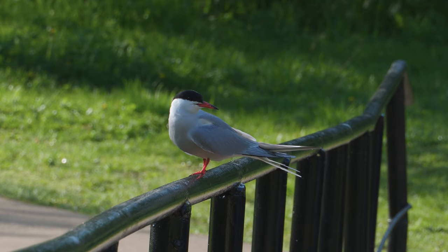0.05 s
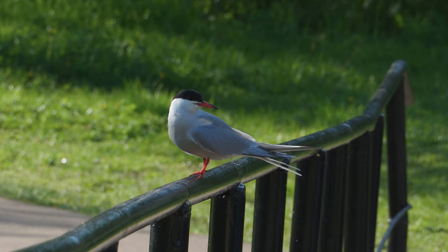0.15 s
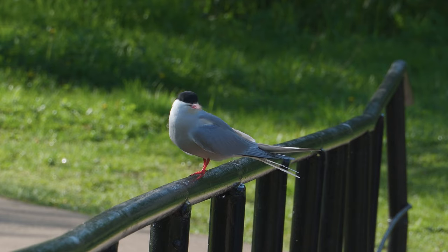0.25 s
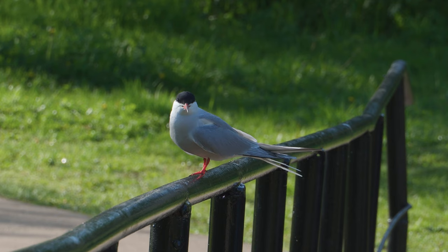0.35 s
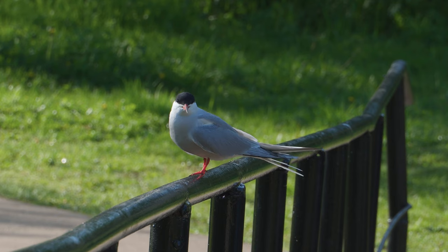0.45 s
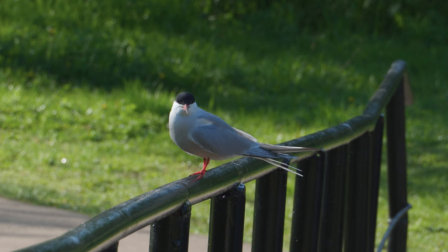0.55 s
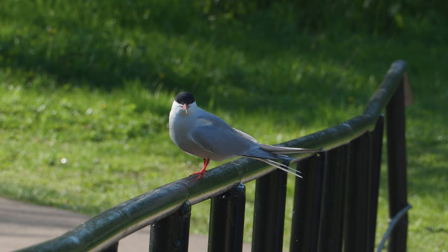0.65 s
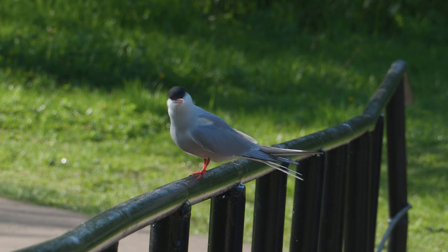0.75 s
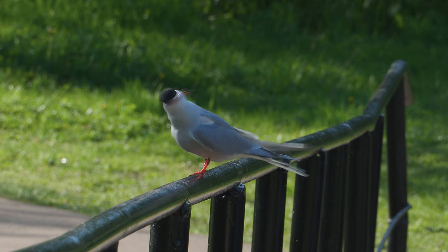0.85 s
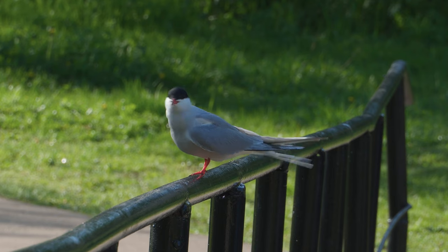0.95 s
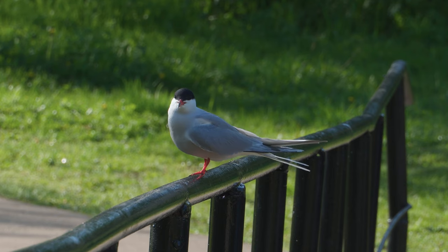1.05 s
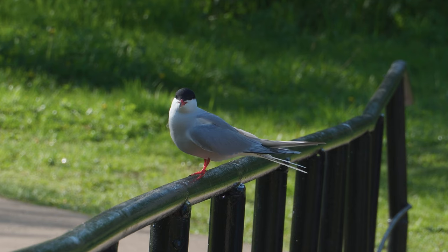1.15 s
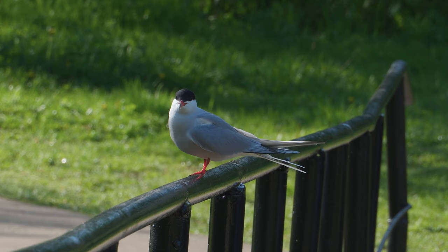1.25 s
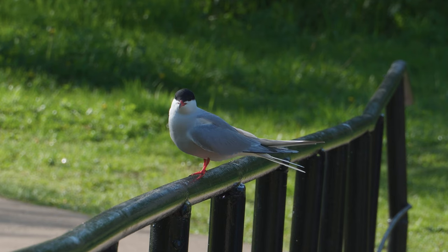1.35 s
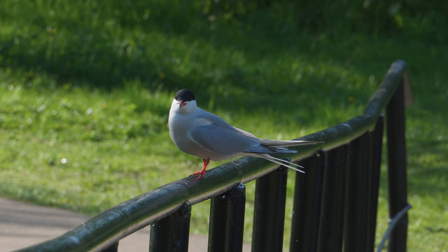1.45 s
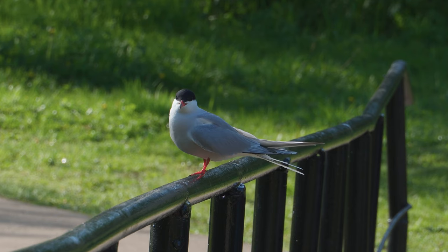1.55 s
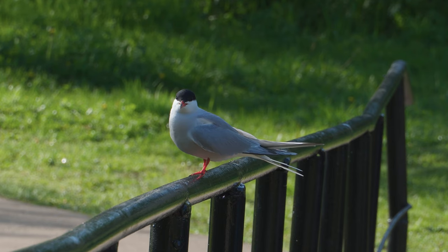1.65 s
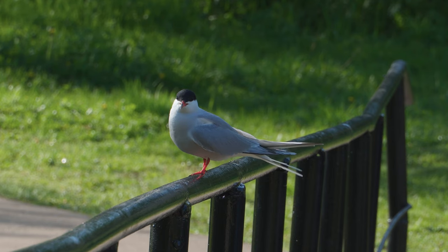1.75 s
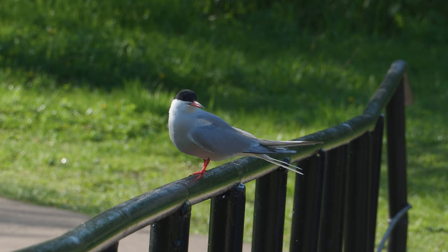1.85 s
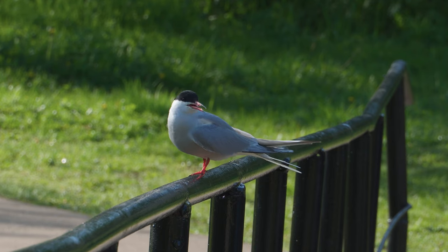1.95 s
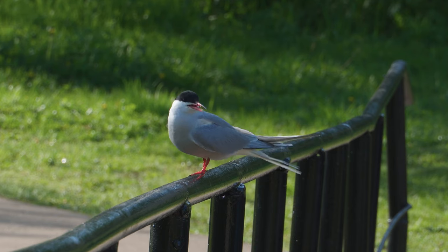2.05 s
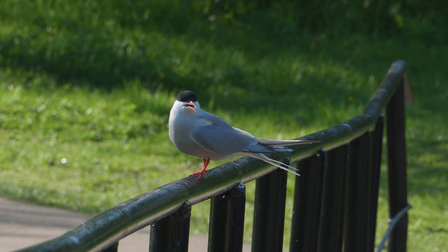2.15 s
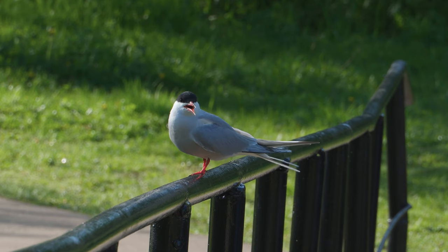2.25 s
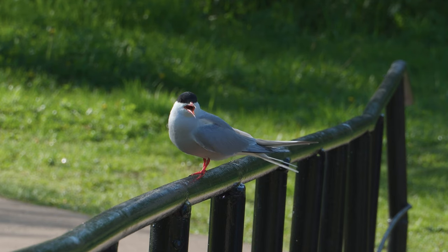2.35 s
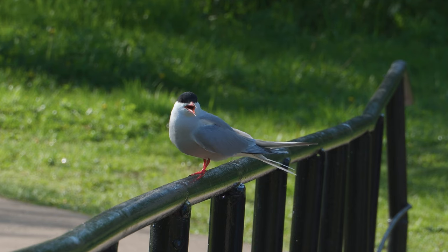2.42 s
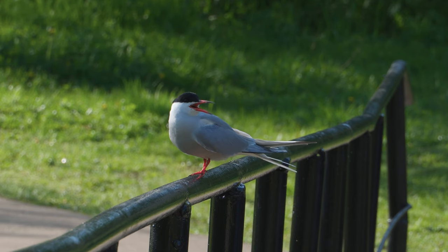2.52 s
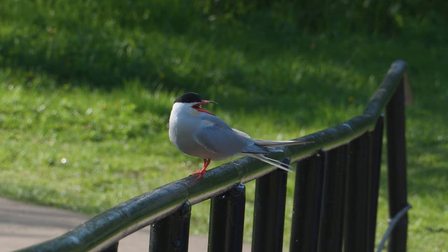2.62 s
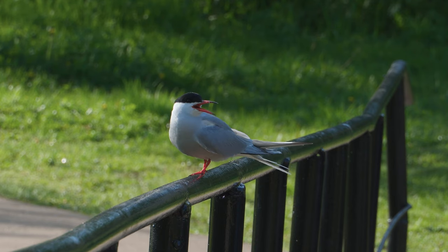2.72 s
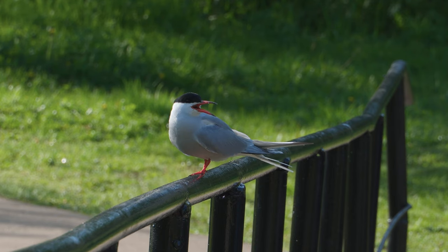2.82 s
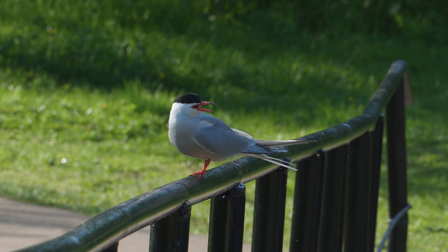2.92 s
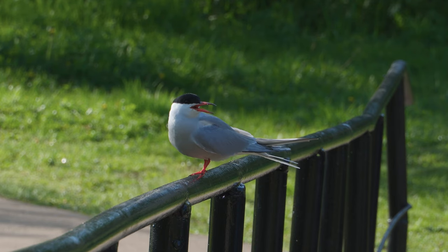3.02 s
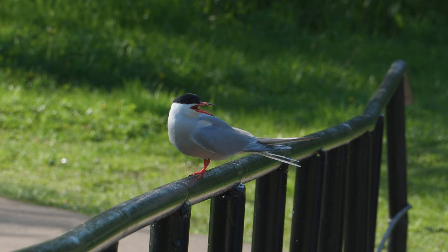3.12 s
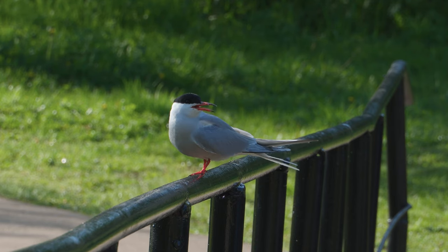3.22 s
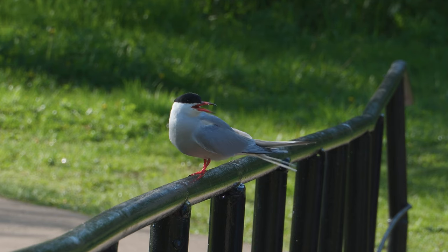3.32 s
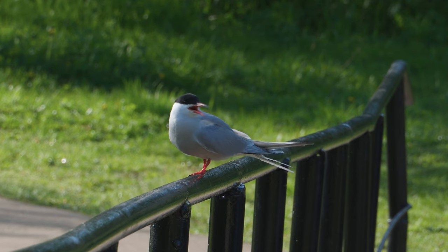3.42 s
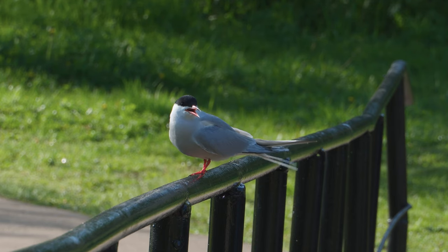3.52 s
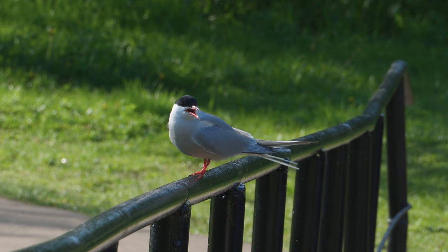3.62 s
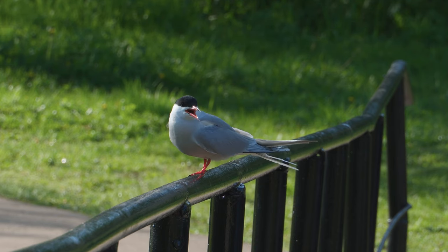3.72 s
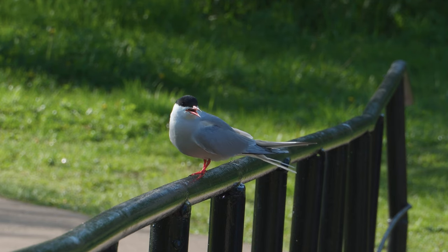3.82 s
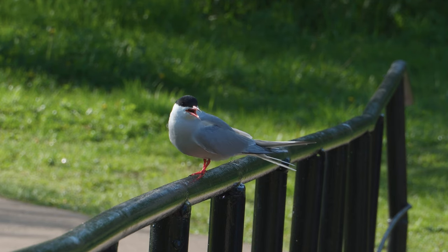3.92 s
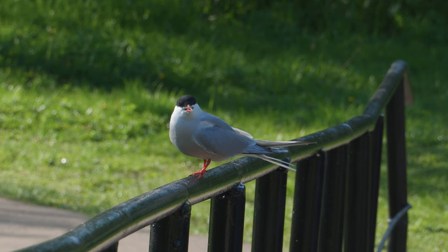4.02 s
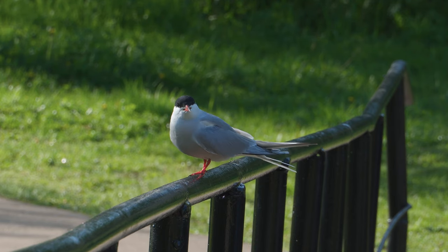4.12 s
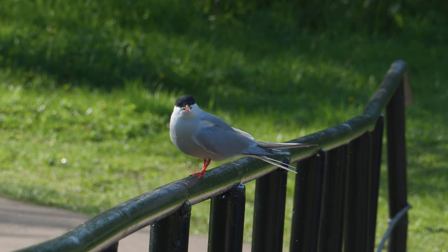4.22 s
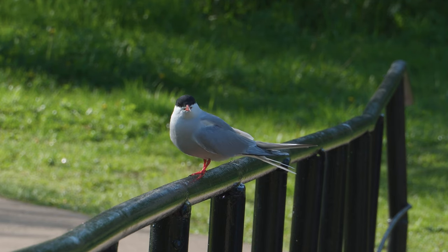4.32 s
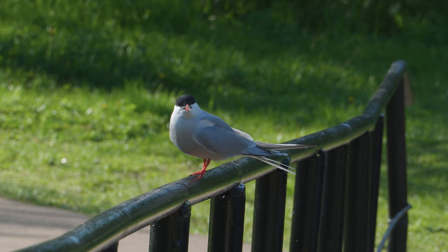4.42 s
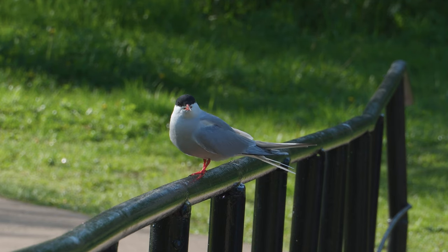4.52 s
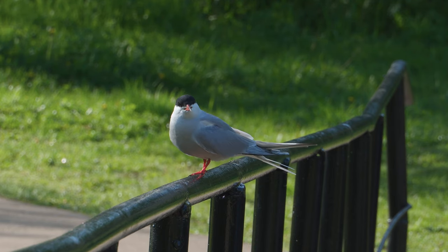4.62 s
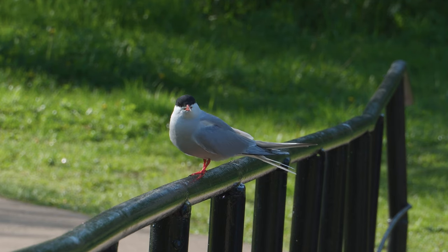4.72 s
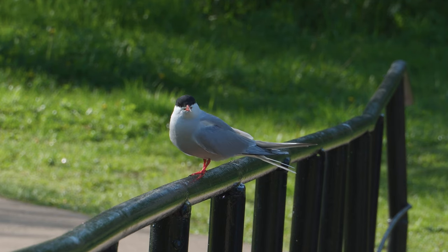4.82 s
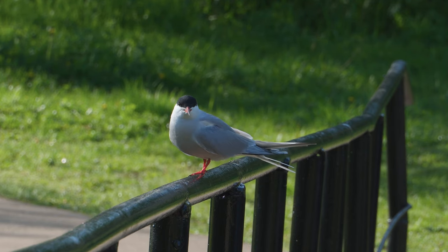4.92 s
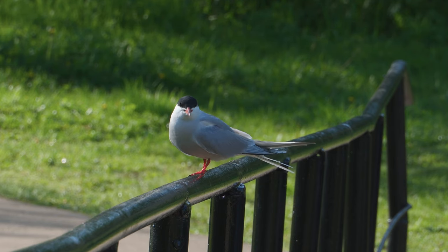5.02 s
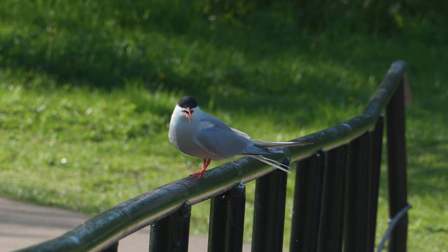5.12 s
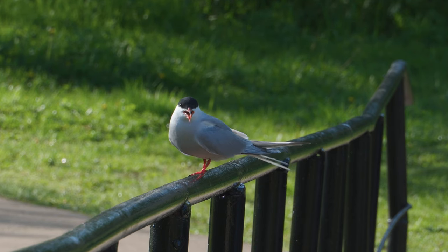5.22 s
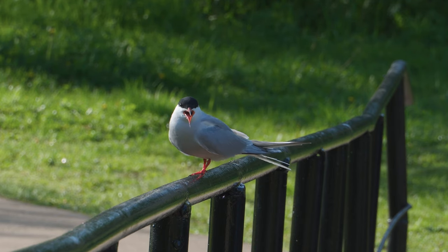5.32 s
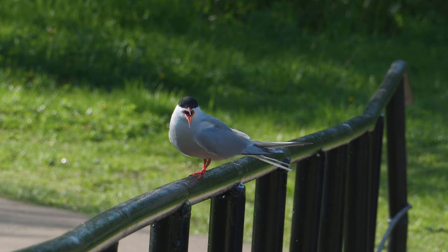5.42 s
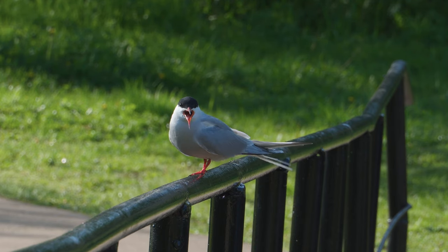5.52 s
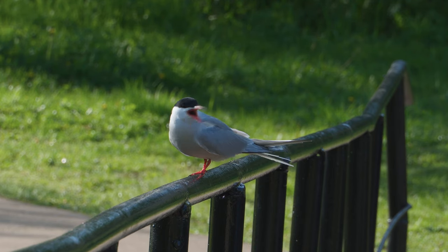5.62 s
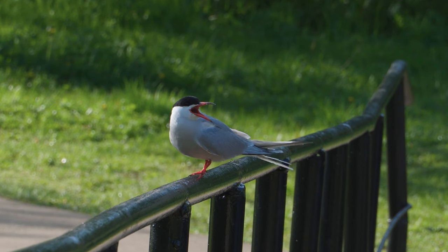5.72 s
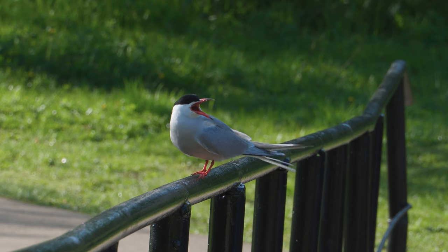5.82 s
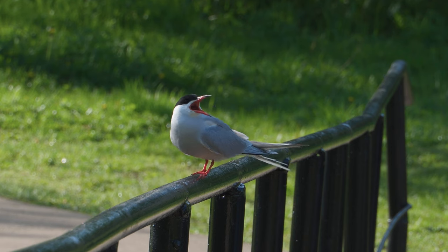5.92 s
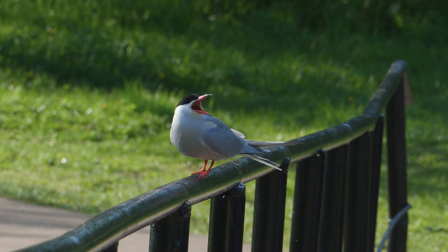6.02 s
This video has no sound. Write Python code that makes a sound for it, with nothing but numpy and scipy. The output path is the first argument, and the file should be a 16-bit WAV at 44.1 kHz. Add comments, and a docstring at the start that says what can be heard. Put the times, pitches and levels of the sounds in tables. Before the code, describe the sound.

A steady outdoor hiss with a faint low hum fills a park for about six seconds. A nearby tern gives soft, muffled notes at about 0.2 and 1.8 seconds. Far off, a small bird repeats thin, high chirps about three times a second until nearly 4 seconds, with faint twittering during the first two.

From 2 to 4 seconds the tern chatters harshly, six or seven calls a second, loudest around 3 seconds. Each call is a rising, fluttering rasp that breaks upward into a clear, falling squeak. One more soft note follows just after 4 seconds. A second bout starts at about 5.1 seconds and runs to the end, its rasps growing longer, rougher and louder. The tern sounds close, with almost no echo. Soft plops and tiny ticks are scattered throughout, the clearest plop near 4.4 seconds.

```python
"""In a park, a tern on a railing chatters in two bouts, after a few soft notes with its bill closed.
Each call is a rising rasp from its voice box (the syrinx) that flutters, often catches,
then breaks upward into a clear falling squeak. A small bird chirps far off;
soft plops and ticks sit in a steady outdoor hiss with a faint hum."""
import sys
import numpy as np
from scipy import signal
from scipy.fft import rfft, irfft, next_fast_len
from scipy.io import wavfile
from scipy.ndimage import map_coordinates

SR = 44100
rng = np.random.default_rng(int(sys.argv[2]) if len(sys.argv) > 2 else 0)


def generate_wav(signal):
    """Clip the signal to [-1, 1] and save it as 16-bit WAV at the path in sys.argv[1]."""
    frames = np.transpose(np.atleast_2d(signal))
    scaled = np.clip(frames, -1, 1) * 32767
    pcm = np.round(scaled).astype(np.int16)
    wavfile.write(sys.argv[1], SR, pcm)


N = 267246
TOP_HZ = 15900  # the highest sound in the scene


def amp(db):
    """Turn decibels into a number to multiply by."""
    return 10 ** (np.asarray(db) / 20)


def unit(x):
    """Scale a sound to an average (rms) level of 1."""
    return x / np.sqrt(np.mean(x ** 2) + 1e-20)


def along(points, hz):
    """Read between (frequency_hz, value) points, giving each octave equal room."""
    point_hz, values = np.transpose(points)
    return np.interp(np.log(hz + 1), np.log(point_hz + 1), values)


def wobble(rate, size=N):
    """A smooth curve through `rate` random values a second."""
    knots = rng.standard_normal(int(size * rate / SR) + 4)
    return map_coordinates(knots, [np.arange(size) * rate / SR])


def filtered(x, response):
    """Turn each frequency up or down by response(hz)."""
    size = next_fast_len(N + SR // 2)
    return irfft(rfft(x, size) * response(np.fft.rfftfreq(size, 1 / SR)), size)[:N]


def noise(spectrum):
    """Noise of level 1, coloured by (frequency_hz, gain_db) points."""
    return unit(filtered(rng.standard_normal(N), lambda hz: amp(along(spectrum, hz))))


def sine(pitch):
    """A pure tone that follows a pitch curve in Hz."""
    return np.sin(2 * np.pi * np.cumsum(pitch) / SR)


def add(track, start, sound):
    """Mix a sound into the track, `start` seconds in."""
    part = track[round(start * SR):][:len(sound)]
    part += sound[:len(part)]


def ramp(x):
    """A smooth step from 0 to 1 as x goes from 0 to 1."""
    return np.sin(np.pi / 2 * np.clip(x, 0, 1)) ** 2


# colour of the outdoor hiss: frequency_hz, gain_db
HISS_COLOUR = [(12, -44), (20, -12.5), (104, -5.5), (146, -8), (293, -1), (780, -3), (1150, -3.5),
               (1860, -6), (2530, -10), (3740, -11.5), (7110, -25), (8650, -21.5), (10200, -34),
               (13200, -31.5), (16000, -39)]
# how the breeze swells and eases: time_s, relative_level_db
BREEZE_LEVELS = [(0.0, -39), (0.42, -42), (1.48, -37), (2.3, -41.5), (2.68, -38.5), (3.12, -39.5),
                 (3.73, -37), (4.51, -40), (6.06, -38)]
# tones in the hum: pitch_hz, level_db
HUM_TONES = [(104, -71.5), (160, -66), (306, -55)]
def background():
    """Hiss and a restless mid-pitched rush swell with the breeze, over a faint wavering hum."""
    breeze_db = np.interp(np.arange(N) / SR, *np.transpose(BREEZE_LEVELS))
    swell_db = breeze_db - np.mean(breeze_db)
    hiss = amp(-37 + .5 * swell_db) * noise(HISS_COLOUR)
    rush_colour = [(150, -33), (350, -10), (900, -0.5), (1600, -10.5), (4000, -26), (9000, -51)]
    rush = amp(-44 + 1.26 * swell_db + 4.2 * wobble(35)) * noise(rush_colour)
    hum = sum(amp(db + 2.4 * wobble(4.76)) * unit(sine(hz + 1.487 * wobble(8))) for hz, db in HUM_TONES)
    return hiss + rush + hum


# distant birdsong: start_s, length_s, fade_in_s, fade_out_s, pitch_hz, wander_share, relative_level_db
SONG_PHRASES = [(0.099, 1.97, .8, 1, 3784, .07, -47.5), (4.844, .28, 0.044, 0.22, 4960, .035, -51)]
def distant_song():
    """Three wandering, flickering whistles blur into each phrase of twittering."""
    out = np.zeros(N)
    for start, length, fade_in, fade_out, hz, wander, db in SONG_PHRASES:
        t = np.arange(int(length * SR)) / SR
        shape = ramp(t / fade_in) * ramp((length - t) / fade_out)
        for _ in range(3):
            flicker = wobble(90, len(t))
            pitch = hz * (1 + wander * wobble(35, len(t)))
            level = amp(db - 5 + 2.2 * wobble(25.1, len(t)))
            add(out, start, level * shape * unit(flicker * sine(pitch)))
    return out


def voice(pitch, throat, third_db=0, dull_db=0, shimmer_db=2, count=14):
    """Harmonics (multiples of the pitch) shaped by a throat; dull_db is the treble lost per octave."""
    harmonics = np.arange(1, count + 1)[:, None]
    hz = harmonics * pitch
    shimmer = np.array([wobble(347.8, len(pitch)) for _ in harmonics])
    gains = amp(along(throat, hz) + shimmer_db * shimmer) * (hz < TOP_HZ)
    gains /= np.sqrt(np.mean(np.sum(gains ** 2, axis=0)) / 2)
    gains[2] *= amp(third_db)  # the third harmonic
    gains *= amp(-dull_db * np.log2(np.maximum(hz / 3500, 1)))
    lag = np.pi * harmonics ** 2 / count  # the throat rings, smearing each pulse over the whole cycle
    return np.sum(gains * np.sin(2 * np.pi * np.cumsum(hz, axis=1) / SR - lag), axis=0)


def arched_notes(rows, throat, sag, waver):
    """Short notes whose pitch and level rise and fall in an arch."""
    out = np.zeros(N)
    for start, length, hz, db in rows:
        edge = np.linspace(-1, 1, int(length * SR)) ** 2  # 1 at both ends, 0 in the middle
        pitch = hz * (1 - sag * edge + waver * wobble(984, len(edge)))
        add(out, start, amp(db) * (1 - edge) * voice(pitch, throat))
    return out


# the tern's soft notes: start_s, length_s, top_pitch_hz, level_db
CLOSED_BILL_NOTES = [(.168, 0.065, 1334, -30.5), (1.820, 0.054, 1330, -31.5), (4.155, 0.044, 1274, -35)]
# colour of its voice with the bill closed: frequency_hz, gain_db
CLOSED_BILL_COLOUR = [(1000, 10.5), (1350, 0), (2650, 1.5), (3800, -21), (5200, -20), (8000, -24),
                      (15800, -48)]
def soft_notes():
    """The tern calls quietly, muffled by its closed bill."""
    return arched_notes(CLOSED_BILL_NOTES, CLOSED_BILL_COLOUR, sag=0.25, waver=0.025)


# the small bird's chirps: start_s, length_s, held_pitch_hz
BIRD_CHIRPS = [(0.282, 0.047, 4860), (0.566, 0.0595, 5400), (.853, 0.084, 4620), (1.161, .028, 4680),
               (1.468, 0.018, 4660), (1.741, 0.023, 4570), (2.025, 0.085, 4700), (2.346, .08, 4660),
               (2.665, 0.034, 4700), (2.986, .03, 4960), (3.295, 0.04, 5800), (3.610, .025, 4770),
               (3.882, 0.02, 4670)]
def small_bird(start_hz=6850, sag_hz=497, level_db=-36):
    """Thin whistles start equally high, drop steeply onto a held note and sag at the end."""
    out = np.zeros(N)
    for start, length, held_hz in BIRD_CHIRPS:
        t = np.arange(int(length * SR)) / SR
        drop = (start_hz - held_hz) * np.exp(-(t / 0.0092) ** 1.74)
        pitch = held_hz + drop - sag_hz * (t / length) ** 6
        shape = ramp(t / 0.0066) * ramp((length - t) / 0.0064)
        level = amp(level_db - 5 * t / length + 0.37 * wobble(130, len(t)))
        add(out, start, level * shape * sine(pitch * (1 + 0.015 * wobble(950, len(t)))))
    return out


# soft plops: start_s, pitch_hz, relative_level_db
PLOP_NOTES = [(.362, 696, -32), (.597, 2000, -27.5), (.722, 2040, -31.5), (.995, 287, -32.5),
              (1.024, 2160, -29.5), (1.319, 900, -26.5), (1.550, 830, -24), (4.006, 940, -26.5),
              (4.355, 876, -18.5), (4.433, 775, -28), (4.780, 410, -31.5), (5.170, 1750, -26),
              (5.658, 416, -28)]
def plops(ring_cycles=29.3):
    """Each plop rings briefly while its pitch rises; higher ones die sooner."""
    out, t = np.zeros(N), np.arange(SR // 5) / SR
    for start, hz, db in PLOP_NOTES:
        age = t * hz / ring_cycles  # reaches 1 when the plop has faded by 60 dB
        pitch = hz * (1 + 0.37 * np.minimum(age, 1) + .12 * wobble(500, len(t)))
        add(out, start, amp(db + 7 - 60 * age) * ramp(age / 0.06) * sine(pitch))
    return out


# sharp ticks: start_s, relative_level_db
TICK_HITS = [(0.394, -28), (4.0725, -31), (5.3397, -31), (5.742, -26), (5.774, -29)]
def ticks(fade_s=0.01):
    """Tiny bright snaps of noise."""
    out, t = np.zeros(N), np.arange(SR // 5) / SR
    for start, db in TICK_HITS:
        add(out, start, amp(db - 2 - 60 * t / fade_s) * rng.standard_normal(len(t)))
    return out


def faint_patter(count=50):
    """Tiny clicks and low rising blips scattered at random, barely above the hiss."""
    clicks, blips, t = np.zeros(N), np.zeros(N), np.arange(SR // 12) / SR
    for when, strength in rng.random((count, 2)):
        fade = amp(-52.5 + 4 * strength ** 2 - 60 * t / .012)
        add(clicks, when * N / SR, fade * rng.standard_normal(len(t)))
    for when, strength, height in rng.random((count, 3)):
        pitch = 350 * 5 ** height * (1 + t / 0.098)
        fade = amp(-38.5 + 9 * strength ** 2 - 60 * t / .05)
        add(blips, when * N / SR, fade * ramp(t / .004) * sine(pitch))
    click_colour = [(500, -8), (2000, 8), (5000, 19), (9000, 12), (15000, -3)]
    return blips + filtered(clicks, lambda hz: amp(along(click_colour, hz)))


# colour of the tern's open throat in the rasp: frequency_hz, gain_db
RASP_COLOUR = [(900, 1), (1250, -6.5), (1800, -32), (2450, 1.5), (3000, 5.5), (3600, 3), (4100, -8.5),
               (4700, 1), (5200, -11), (6000, -17), (7300, -14.5), (8700, -12.5), (10200, -29.5),
               (12500, -21.5), (15800, -31)]
def rasp(t, start, break_s, slide_s, hz, rough, breath, flutter_hz=81):
    """A call's low part: each flutter of the voice box is louder, lower and rougher."""
    peak_s = break_s - 0.01527  # the effort peaks just before the break
    age, past_peak = t - start, t - peak_s
    flutter = (.5 + .5 * np.cos(2 * np.pi * flutter_hz * (past_peak - 0.0048))) ** 2
    effort = ramp(age / (peak_s - start + .003))
    slack = np.exp(-age / 0.011)  # the call begins soft and dull
    slide = 1 - .21 * np.exp(-age / slide_s)
    strain = 1 + 0.614 * (past_peak + 0.0164) + 0.0614 * ramp(past_peak / 0.0171)  # tension builds
    chaos = rough * effort * (0.43 * rough + flutter)
    jitter = 0.01 * wobble(294, len(t)) + (0.022 + 0.058 * chaos) * wobble(2600, len(t))
    pitch = hz * slide * strain * (1 - 0.0266 * (flutter - .6) + jitter)
    tone = voice(pitch, RASP_COLOUR, third_db=-13.5 + 13.7 * np.sqrt(flutter),
                 dull_db=slack, shimmer_db=2.5)
    swell_db = -9 * slack - 4.5 * np.exp(-age / 0.015)
    level = amp(swell_db + 2 * flutter - 3.5 + wobble(138, len(t)))
    shape = ramp(age / (0.00047 + slide_s)) * ramp((break_s - t) / 0.0034 + .5)
    return level * shape * (tone + (0.13 + 0.42 * chaos) * breath)


# colour of the open throat in the squeak: frequency_hz, gain_db
SQUEAK_COLOUR = [(1100, -8), (1650, -1.5), (2600, 7.5), (3400, 4), (4100, 5), (4700, 2), (5200, -0.5),
                 (6400, -11), (8400, -8.5), (10200, -24), (12500, -18), (15800, -27)]
def squeak(t, break_s, end, hz):
    """The voice pops up to a clear note that sags, dulls and fades as the air pressure runs out."""
    spent = np.clip((t - break_s) / (end - break_s), 0, 1)
    pop = np.exp(-((t - break_s - .002) / 0.00067) ** 2)
    jitter = 0.0075 * wobble(276.5, len(t)) + (0.0059 + 0.057 * spent ** 2) * wobble(2200, len(t))
    pitch = hz * (1 + 0.015 * pop - 0.013 * spent - 0.369 * spent ** 3 + jitter)
    fade = amp(-6 * spent - 24.3 * spent ** 3 + pop + wobble(201, len(t)))
    shape = ramp((t - break_s) / 0.001 + .5) * ramp((end - t) / .003)
    return fade * shape * voice(pitch, SQUEAK_COLOUR, dull_db=6.8 * spent ** 2)


# calls, timed by the break from rasp to squeak: break_s, rasp_length_s, rasp_pitch_hz, squeak_level_db
TERN_CALLS = [ (2.031, 0.013, 1194, -23), (2.17, 0.038, 1183, -23.5), (2.306, 0.051, 1176, -22),
              (2.451, 0.062, 1189, -24.5), (2.597, 0.065, 1210, -19.5), (2.75, 0.068, 1203, -19),
              (2.901, .069, 1188, -16.5), (3.052, 0.057, 1209, -13), (3.211, 0.049, 1167, -16.5),
              (3.37, .054, 1180, -20), (3.52, 0.059, 1202, -19.5), (3.67, 0.062, 1194, -19.5),
              (3.825, 0.063, 1181, -18), (3.981, .054, 1195, -19), (5.139, .030, 1226, -25.5),
              (5.277, .056, 1193, -26.5), (5.429, 0.066, 1206, -24), (5.569, .066, 1226, -21.5),
              (5.722, 0.083, 1247, -20), (5.884, 0.096, 1275, -19.5), (6.057, .099, 1279, -19)]
# colour of the air swirling in the throat: frequency_hz, gain_db
BREATH_COLOUR = [(400, -48), (900, -42), (1900, 2.5), (2600, -18), (3600, 2.5), (4200, -8), (5100, 7.5),
                 (6200, -6.5), (8600, -16), (10200, -25), (13000, -22), (16000, -37)]
def tern_chatter(usual_rasp_s=0.067):
    """A rasp, then a squeak. Longer rasps are pushed harder, so they are louder and rougher."""
    out, swirl = np.zeros(N), noise(BREATH_COLOUR)
    for break_s, length, hz, squeak_db in TERN_CALLS:
        push = length / usual_rasp_s
        start = break_s - length
        end = break_s + 0.023 / push ** 0.37  # a longer rasp leaves less air for the squeak
        rasp_gain = amp(-18 + 2.5 * np.log2(push))
        rough = min(0.56 * push ** 2.7, 0.96)
        leap = 1.17 + 0.245 * ramp((squeak_db + 27) / 9.5)  # louder squeaks leap higher in pitch
        t = start + np.arange(int((end - start) * SR)) / SR
        breath = np.roll(swirl, -round(start * SR))[:len(t)]
        low = rasp_gain * rasp(t, start, break_s, slide_time(break_s), hz, rough, breath)
        high = amp(squeak_db) * squeak(t, break_s, end, leap * hz)
        add(out, start, low * catches(t) + high)
    return out


# how slowly the rasps slide up to pitch: time_s, slide_s
RASP_SLIDES = [(2.1, 0.0034), (3.0, 0.0088), (4.0, 0.014), (5.3, 0.0063), (6.0, 0.0041)]
def slide_time(break_s):
    """Seconds this call's rasp takes to slide most of the way up to pitch."""
    return np.interp(break_s, *np.transpose(RASP_SLIDES))


# moments when a rasp catches: time_s
CATCH_TIMES = [2.149, 2.160, 2.297, 2.428, 2.581, 2.736, 2.880, 2.893, 3.038, 3.202, 3.352, 5.705, 5.865,
               5.879, 6.029, 6.043]
def catches(t, depth_db=18.5, half_shut_s=0.0023):
    """Dips in level: the voice box squeezes shut for a few milliseconds, then bursts open."""
    gain = np.ones(len(t))
    for moment in CATCH_TIMES:
        closing = ramp((t - moment + half_shut_s) / 0.0014 + .5)
        opening = ramp((moment + half_shut_s - t) / 0.0011 + .5)
        gain *= amp(-depth_db * closing * opening)
    return gain


# notes from the other side of the voice box: start_s, length_s, top_pitch_hz, level_db
SECOND_NOTES = [(5.411, 0.035, 1024, -27), (5.821, 0.026, 1534, -17), (6.003, 0.0257, 1402, -19)]
# the darker colour of that side: frequency_hz, gain_db
SECOND_COLOUR = [(1000, 8), (1500, -7), (2100, 6.5), (3100, -6.5), (4600, -7), (6200, -20), (15800, -31)]
def second_voice():
    """A bird's voice box has two sides; the tern's other side joins in on three late calls."""
    return arched_notes(SECOND_NOTES, SECOND_COLOUR, sag=0.135, waver=0.026)


# how long the park's echo takes to fade by 60 dB: frequency_hz, fade_s
ECHO_FADES = [(300, 0.26), (3000, 0.74), (6000, 0.35), (14000, 0.091)]
def park_echo(sound):
    """Ground and trees scatter a thin echo; the highest treble dies first."""
    hz, t, spectrum = signal.stft(rng.standard_normal(SR // 2), SR, nperseg=256)
    fade = amp(-60 * t / along(ECHO_FADES, hz)[:, None])
    _, tail = signal.istft(spectrum * fade, SR, nperseg=256)
    delayed = np.pad(sound, (200, 0))
    return signal.fftconvolve(delayed, tail / np.linalg.norm(tail))[:N]


def scene():
    """The near tern has almost no echo; the far sounds carry more."""
    near = tern_chatter() + second_voice() + soft_notes()
    far = small_bird() + distant_song() + plops() + ticks() + faint_patter()
    echo = park_echo(amp(-21) * near + amp(-10) * far)
    return (near + far + echo + background())[None]


def record(dry):
    """Cut away everything above TOP_HZ."""
    return filtered(dry[0], lambda hz: hz < TOP_HZ)[None]


dry = scene()
out = record(dry)
generate_wav(out)
```